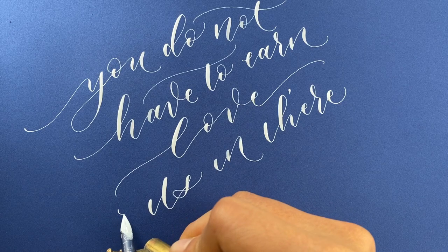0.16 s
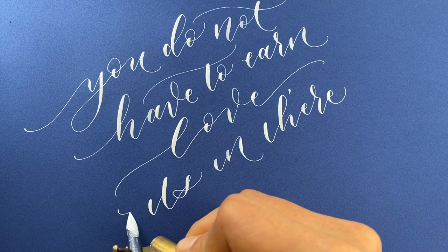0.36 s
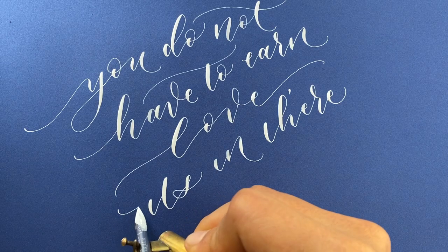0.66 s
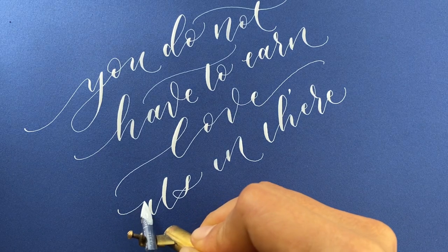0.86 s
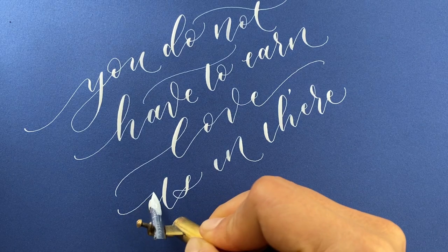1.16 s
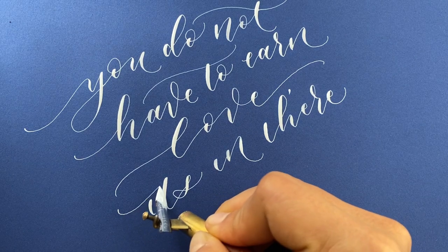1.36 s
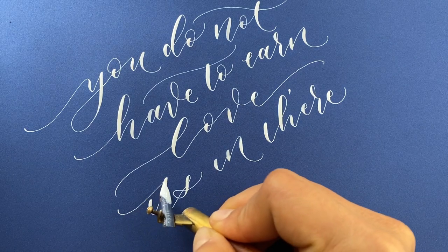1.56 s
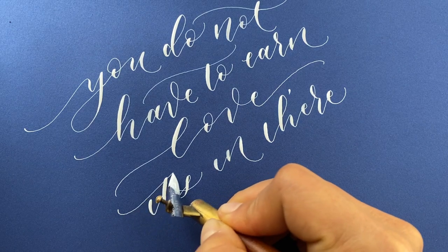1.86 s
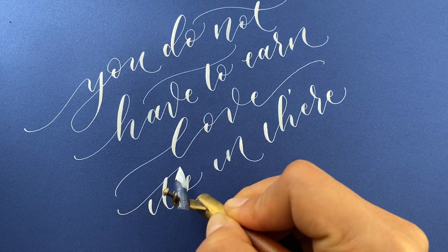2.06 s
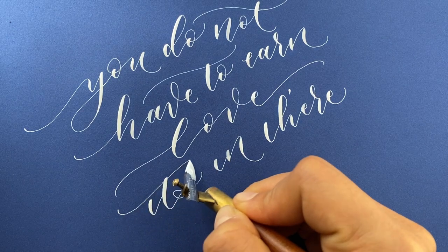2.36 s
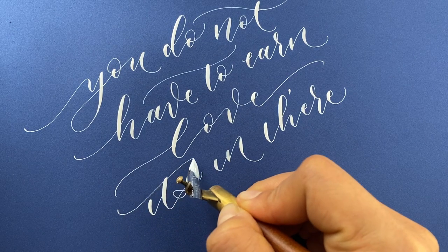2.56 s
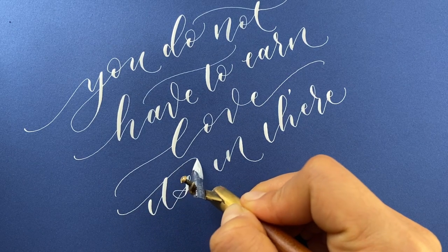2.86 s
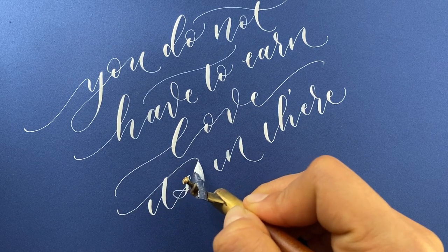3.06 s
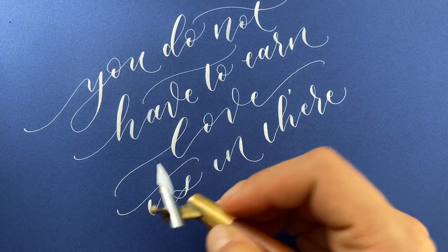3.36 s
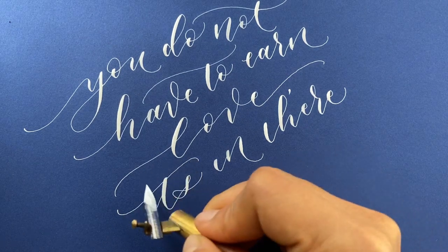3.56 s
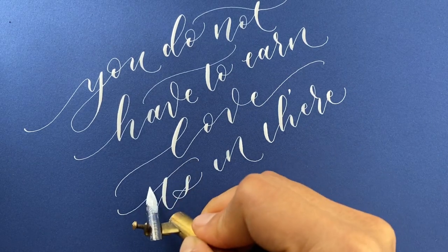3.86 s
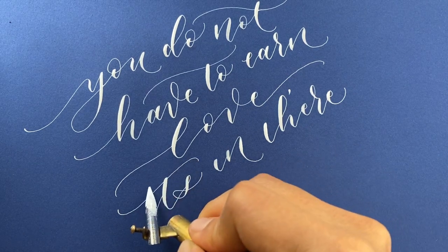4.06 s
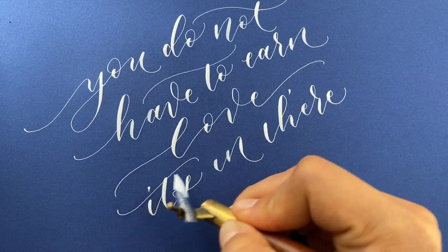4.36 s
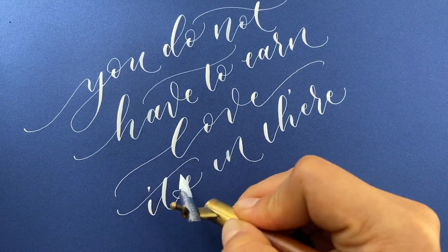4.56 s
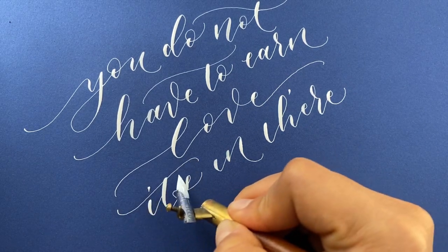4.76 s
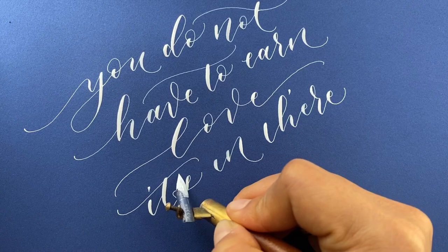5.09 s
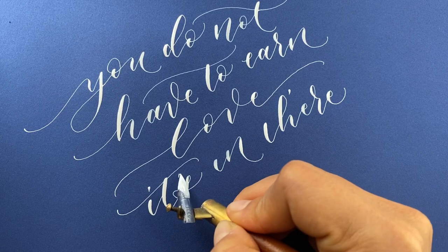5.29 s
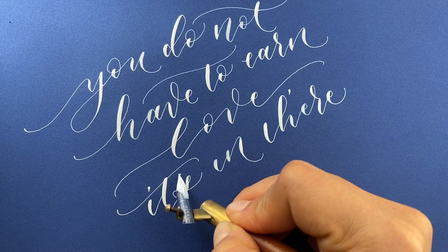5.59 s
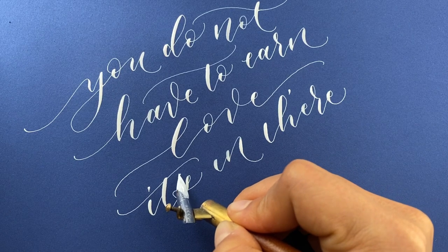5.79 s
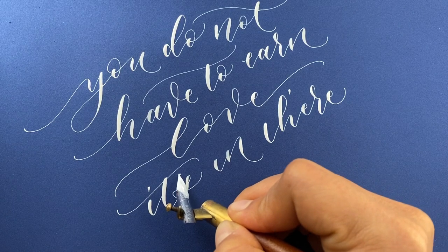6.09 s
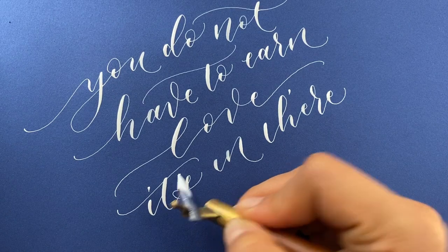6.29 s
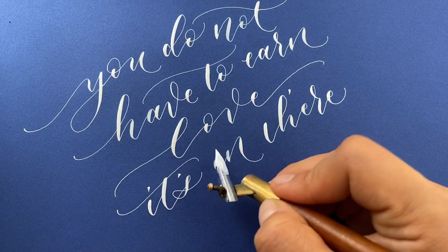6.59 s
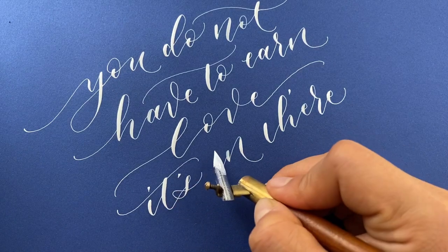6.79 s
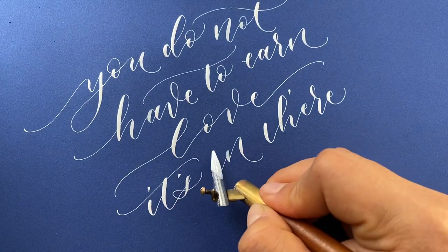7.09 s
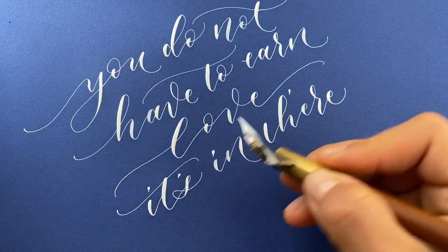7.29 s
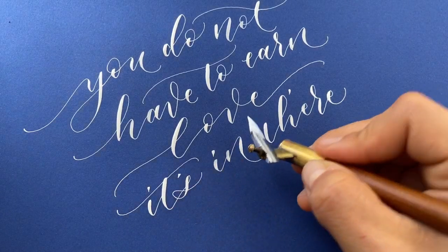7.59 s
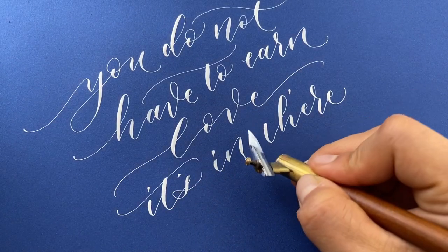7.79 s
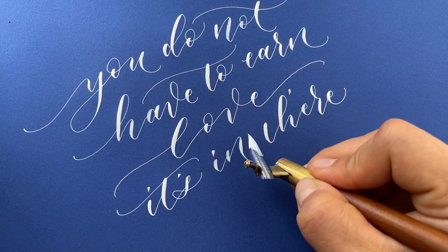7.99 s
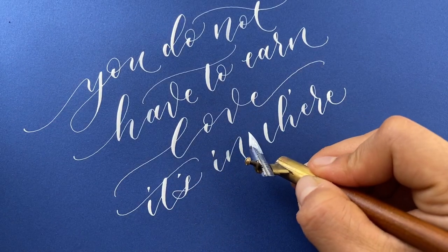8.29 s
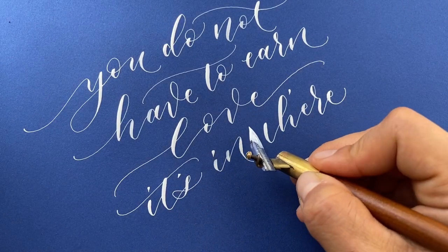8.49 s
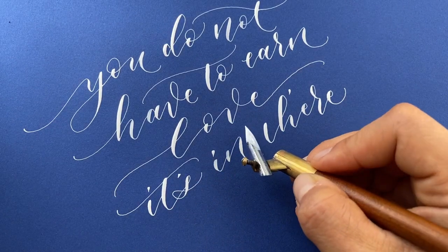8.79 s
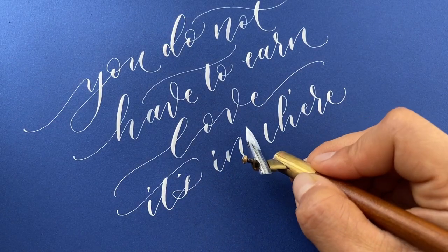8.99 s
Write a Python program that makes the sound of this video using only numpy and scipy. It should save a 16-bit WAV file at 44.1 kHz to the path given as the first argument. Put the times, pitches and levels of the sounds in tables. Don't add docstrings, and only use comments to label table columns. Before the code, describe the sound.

A deep, steady hum fills a quiet room while a dip pen scrapes paper close by: faint dry ticks, a rougher stuttering scratch, then smoother scrapes fading out. After a near-silent gap come small dull knocks on the desk, tiny holder creaks and brief papery hand rubs. The nib sits slightly left; faint road noise stays far behind.

```python
import sys
import numpy as np
from scipy import signal
from scipy.fft import rfft, irfft, next_fast_len
from scipy.io import wavfile
from scipy.ndimage import uniform_filter1d

SR = 44100
rng = np.random.default_rng(int(sys.argv[2]) if len(sys.argv) > 2 else 0)


def ratio_of_db(decibels):
    return 10 ** (np.asarray(decibels, float) / 20)


def dump_mix(stems):
    frames = np.atleast_2d(stems).T
    limited = np.clip(frames, -1, 1)
    pcm = np.round(limited * 32767).astype(np.int16)
    wavfile.write(sys.argv[1], SR, pcm)


N = 403284
T = np.arange(N) / SR
SIZE = next_fast_len(N + 4096)
HZ = np.arange(SIZE // 2 + 1) * SR / SIZE + 1e-3


def unit(x):
    return x / np.sqrt(np.mean(x ** 2))


def along(table):
    hz, value = np.transpose(table)
    return np.interp(np.log(HZ), np.log(hz), value)


def peak(hz, width):
    return 1j * width * HZ / (hz ** 2 - HZ ** 2 + 1j * width * HZ)


def heard(spectrum):
    return irfft(spectrum, SIZE)[..., :N]


def hiss(response, count):
    chance = rng.standard_normal((2, count, len(HZ)))
    return unit(heard((chance[0] + 1j * chance[1]) * response))


def walk(rate):
    k = int(SR / rate)
    held = np.repeat(rng.standard_normal(N // k + 1), k)
    slewed = uniform_filter1d(uniform_filter1d(held, k), k)
    return unit(slewed[:N])


def causal(gain):
    cepstrum = irfft(np.log(gain + 1e-9), SIZE)
    cepstrum[1:SIZE // 2] *= 2
    cepstrum[SIZE // 2 + 1:] = 0
    return np.exp(rfft(cepstrum))


def moves(rows, shape, dull_ends=0.):
    edge_db = 12
    dull, bright = np.zeros(N), np.zeros(N)
    for s, rise, fall, db, bright_db in rows:
        on = slice(max(int((s - 4 * rise) * SR), 0), int((s + 4 * fall) * SR))
        away = np.where(T[on] < s, (s - T[on]) / rise, (T[on] - s) / fall)
        gain = ratio_of_db(db - edge_db * away ** shape)
        dull[on] += gain
        bright[on] += gain * ratio_of_db(bright_db - dull_ends * away ** 2)
    return np.array([dull, bright])


def split(dull, bright, hz=8000):
    low = 1 / (1 + 1j * HZ / hz) ** 2
    return rfft(dull, SIZE) * low + rfft(bright, SIZE) * (1 - low)


def bursts(events, low, high, rise_s):
    out, age = np.zeros(N), np.arange(6000) / SR
    noises = rng.standard_normal((len(events), len(age)))
    for (s, db, hz, t60), noise in zip(events, noises):
        band = [low * hz, min(high * hz, 20000)]
        burst = signal.sosfilt(signal.butter(2, band, "band", fs=SR, output="sos"), noise)
        fade = (1 - np.exp(-age / rise_s)) * np.exp(-np.log(1000) * age / t60)
        level = np.sqrt(np.sum(fade ** 2) / np.sum((burst * fade) ** 2))
        out[int(s * SR):][:len(age)] += ratio_of_db(db) * burst * fade * level
    return out


# pitch_hz, lead_rad
PORT_LEAD = [(0, 0), (1500, .4), (3200, .9), (5000, .4), (7000, -.6), (7700, -1.7)]


def ports(spectrum, balance, blur_db):
    raw = HZ > 7900
    travel_s, most_rad = .000187, 2.5
    travel_lead = np.minimum(2 * np.pi * (2 - HZ * travel_s), most_rad)
    lead = np.where(raw, travel_lead, np.interp(HZ, *np.transpose(PORT_LEAD)))
    half = ratio_of_db(along(balance) / 2) * np.exp(.5j * lead)
    scatter = rfft(rng.standard_normal((2, 2500)) * np.exp(-np.arange(2500) / 200.0), SIZE)
    blur = 1 + ratio_of_db(blur_db - 2.3 * raw) * scatter
    return heard(spectrum * np.array([half, 1 / half]) * blur)


# pitch_hz, level_db (per Hz)
AIR = [(15, -52.5), (25, -23.5), (49, -6), (87, -13), (105, -13), (123, -9.5), (166, -15.5), (206, -20.5),
       (373, -34), (659, -54.5), (1020, -49.5), (1230, -61.5), (1520, -46), (2050, -60), (16000, -80.5)]
# pitch_hz, side_minus_mid_db
AIR_WIDE = [(60, -15.5), (250, -3.5), (600, -3), (1500, -3), (5000, -5.5), (15000, 5)]
# tyre_db, engine_db
ROAD_DB = (-90.5, -87.5)
# nearest_s, length_s, tyre_db, engine_db
VEHICLES = [(.45, 0.47, -80, -81), (1.15, 0.23, -79, -80.5), (2.25, 0.5, -86, -83), (3.5, 0.29, -88, -91.5),
            (4.15, .25, -86.5, -85), (5.35, 0.34, -92, -77.5), (6.1, .35, -80.5, -78),
            (7.45, .5, -84.5, -82.5), (8.35, 0.4, -80.5, -85.5), (8.75, 0.2, -83, -81.5)]


def air():
    colour = ratio_of_db(along(AIR))
    still = hiss(np.array([colour, colour * ratio_of_db(along(AIR_WIDE))]), count=2)
    still = still * ratio_of_db(-59 - 1.12 + 1.4 * walk(3.2))
    s, length, *peak_db = np.transpose(VEHICLES)
    slow = T[::441]
    near = np.exp(-((slow[:, None] - s) / length) ** 2)
    tyre, engine = (np.interp(T, slow, np.sqrt(ratio_of_db(2 * base) + near @ ratio_of_db(2 * db)))
                    for base, db in zip(ROAD_DB, peak_db))
    tyres = hiss(peak(1027, 300) ** 2 + ratio_of_db(-12.5) * peak(1400, 400) ** 2, count=2)
    engines = hiss(peak(580, 450) ** 2, count=2)
    tyres = tyres * tyre * ratio_of_db(1.6 * walk(14) - [[-1], [3]])
    engines = engines * engine * ratio_of_db(1.3 * walk(9) - [[1], [0]])
    mid, side = still + tyres + engines
    capsules = ratio_of_db(-93) * hiss(peak(3500, 5400) * peak(4000, 12000), count=2)
    return np.array([ratio_of_db(-0.16) * mid + side, ratio_of_db(-2.0) * mid - side]) + capsules


# start_s, turn_db, octave_db, third_multiple_db
HUM = [(0.0, -43.5, -57, -76.5), (0.48, -43.5, -52, -71.5), (1.09, -44.5, -62.5, -69.5),
       (1.4, -46.5, -67, -76), (2.3, -41.5, -70.5, -73), (2.65, -40.5, -68.5, -77.5),
       (3.28, -47.5, -62.5, -81), (3.79, -45.5, -60, -83), (4.4, -38.5, -57, -85.5),
       (5.11, -41, -56.5, -64.5), (5.78, -42, -59, -75.5), (6.19, -41, -60.5, -69), (6.5, -40.5, -55, -79),
       (7.0, -44, -64, -87.5), (7.66, -45.5, -63, -81), (8.2, -46, -59, -84), (8.65, -46, -51.5, -72),
       (9.14, -47.5, -58.5, -73.5)]
# start_s, pitch_hz
HUM_HZ = [(0, 78.55), (1.8, 78.4), (2.3, 78.25), (3.1, 78.6), (3.9, 78.25), (5.1, 77.95), (6.2, 77.95),
          (7, 77.6), (8, 77.25), (9.2, 77.5)]
# multiple, centre_s, length_s, level_db
WHINE = (8, 5.5, 0.64, -84)


def hum():
    s, *levels = np.transpose(HUM)
    levels.append(levels[-1] - 0.43)
    phase = 2 * np.pi * np.cumsum(np.interp(T, *np.transpose(HUM_HZ))) / SR
    tone = np.zeros(N)
    for k, (db, start_rad) in enumerate(zip(levels, [1.3, .9, 2.1, 4.2])):
        swell_db = np.interp(T, s, db) + (0.62 + .35 * k) * walk(6)
        tone += np.sqrt(2) * ratio_of_db(swell_db) * np.sin((k + 1) * phase + start_rad)
    multiple, at, length, db = WHINE
    tone += ratio_of_db(db) * np.exp(-((T - at) / length) ** 4) * np.sin(round(multiple) * phase)
    lag = 2
    return np.array([ratio_of_db(-1.8) * np.r_[tone[:lag], tone[:-lag]], ratio_of_db(0.98) * tone])


# top_s, rise_s, fall_s, level_db, brightness_db
SLIDES = [
    (4.375, 0.096, .078, -69, 5),
    (6.47, 0.099, 0.11, -66, 4),
    (7.44, .14, 0.17, -63.5, 4),
]
# top_s, rise_s, fall_s, level_db,
# brightness_db
LANDINGS = [(4.036, .002, 0.006, -80, 2), (4.132, 0.0078, 0.0044, -59, 0.5),
            (4.138, 0.0044, 0.0043, -56.5, -5.5), (4.145, 0.0033, 0.015, -59, 0),
            (4.103, .004, 0.04, -75, -2.5), (4.172, 0.017, .01, -75, 0), (4.27, .03, .03, -90, 10),
            (7.27, .04, .03, -93, 10), (6.296, 0.0078, 0.019, -83.5, 3), (7.028, 0.003, 0.004, -78, 3),
            (7.094, 0.005, 0.008, -75, 4), (7.18, 0.016, 0.01, -60, -1.5), (7.145, .012, .04, -68.5, -4.5),
            (7.21, .02, 0.034, -75, -2), (5.8, 0.0034, .008, -81, 1.5), (7.588, .002, .005, -64.5, -8)]
# pitch_hz, level_db
SKIN = [(300, -26), (800, -9), (1300, -6.5), (3000, 1), (4800, -2.5), (7000, -3), (8300, -1.5), (11500, -3),
        (13100, -2), (15600, -9.5), (16200, -31)]
# start_s, level_db, pitch_hz, t60_s
KNOCKS = [(4.035, -62.5, 800, 0.036), (4.035, -68, 1890, .02), (4.13, -50, 340, 0.14),
          (4.134, -57.5, 810, 0.14), (4.136, -59.5, 1730, 0.06), (4.996, -74, 890, 0.069),
          (5.385, -58.5, 300, 0.11), (5.39, -65.5, 908, 0.16), (7.098, -57, 270, 0.088),
          (7.167, -52.5, 432, 0.075), (7.167, -64.5, 800, 0.078), (7.167, -66, 1500, 0.15),
          (3.63, -79.5, 950, 0.18), (2.33, -71, 1750, 0.36), (4.038, -50.5, 231, 0.09),
          (4.7972, -64, 5200, .008), (7.157, -59, 650, 0.053), (7.213, -61.5, 400, 0.09),
          (7.14, -55.5, 230, 0.17)]
# start_s, level_db, pitch_hz, t60_s
CREAKS = [(2.668, -67.5, 11000, .023), (2.669, -62, 15200, .019), (3.035, -82, 4690, .1),
          (3.101, -72, 1300, .06), (3.1015, -76, 2100, .03), (2.7, -63, 1400, 0.052),
          (3.123, -70, 2000, 0.028), (3.283, -76, 10900, .04), (3.346, -82, 4600, .03),
          (3.385, -83, 10200, .08), (4.034, -68, 14800, .02), (4.0345, -71, 12000, .04),
          (4.035, -67, 3260, .04), (4.136, -58, 4400, .03), (4.143, -64, 11500, .03),
          (5.043, -72, 5200, .09), (5.06, -74, 4900, .08), (5.07, -70, 3100, .04),
          (5.108, -77.5, 4970, .043), (5.463, -76, 5100, .08), (5.476, -77, 5100, .08),
          (5.499, -76.5, 5100, .05), (5.507, -75, 5200, .07), (5.523, -75.5, 5100, .06),
          (6.03, -85.5, 5030, .12), (6.905, -73, 6300, .028), (6.9055, -75, 2700, .04),
          (7.02, -69, 15000, .03), (7.027, -71, 12200, .02), (7.0275, -72, 9500, .02),
          (7.08, -69, 15000, .02), (7.0805, -72, 12200, .02), (7.091, -62, 15000, .04),
          (7.0915, -66, 12200, 0.049), (7.092, -73, 3200, .038), (7.115, -70, 15000, .03),
          (7.117, -74, 3200, .04), (7.135, -72, 15000, .1), (7.172, -62, 15000, .04)]
# pitch_hz, left_minus_right_db
HAND_BALANCE = [(200, 0), (1300, 4.5), (2400, 2.5), (4800, 6), (7000, 1.5), (8200, -0.5), (15000, 0)]


def hand():
    rub = rng.standard_normal(N) * ratio_of_db(1.0 * walk(90) + 4.0)
    dull, bright = rub * (moves(SLIDES, 5.1, 7.4) + moves(LANDINGS, 1.1))
    slide = split(dull, bright) * ratio_of_db(along(SKIN))
    thuds = bursts(KNOCKS, low=0.51, high=0.98, rise_s=0.0003)
    creaks = bursts(CREAKS, low=.88, high=1.0, rise_s=0.0022)
    cloth = hiss(peak(11000, 3500) ** 2 + ratio_of_db(3) * peak(12050, 150), count=1)[0]
    rustle = cloth * ratio_of_db(-104 + 2.7 * walk(15))
    return ports(slide + rfft(thuds + creaks + rustle, SIZE), HAND_BALANCE, blur_db=-28.0)


# top_s, rise_s, fall_s, level_db, brightness_db
STROKES = [(.28, 0.077, 0.072, -92.5, 7), (.365, 0.026, 0.062, -82, 2.5), (.5, 0.055, 0.11, -83, 6.5),
           (.67, 0.045, 0.058, -82, 5.5), (.79, 0.039, .055, -67.5, -4), (.89, 0.089, 0.071, -80, -2),
           (1.05, 0.17, 0.063, -71, -6.5), (1.22, 0.12, 0.098, -69.5, -7), (1.37, 0.098, .11, -70, -7),
           (1.545, 0.027, 0.027, -74.5, -3), (1.66, 0.064, 0.039, -89.5, 2),
           (1.762, 0.026, .035, -59, -6.5), (1.855, 0.032, .048, -62, -8), (1.915, .008, .01, -69.5, -5),
           (1.98, .04, .06, -60.5, -8), (2.09, 0.07, 0.05, -61.5, -7), (2.152, 0.0053, 0.0094, -70.5, -4),
           (2.21, .033, 0.039, -60, -6), (2.32, 0.043, 0.031, -64.5, -5.5), (2.415, 0.024, 0.03, -71, -5),
           (2.54, .024, 0.029, -82, -1)]


def fibre_grains(brush):
    size_db = 4.5 * np.minimum(rng.exponential(size=N), 3.5)
    plucks_per_s = 6000
    grains = (rng.random(N) < plucks_per_s / SR) * rng.standard_normal(N) * ratio_of_db(size_db)
    grains = unit(grains) * ratio_of_db(2.7 * walk(90) + 1.9 * walk(300) + 3.0)
    return grains * (moves(STROKES, 3.2) + brush)


# start_s, level_db, brightness_db
SNAPS = [(0.1498, -75.5, -7), (0.2337, -72.5, -8), (0.2458, -73.5, -9), (0.2906, -71, -8),
         (0.3042, -69, -9), (0.3123, -74.5, -11.5), (0.3289, -67.5, -9), (0.3484, -67.5, -13),
         (0.3533, -64, -10), (0.3613, -62, -12), (0.3924, -58, -10), (0.409, -70, -8.5),
         (0.4254, -69, -11.5), (0.4464, -69.5, -11), (0.4684, -63.5, -9), (0.4966, -61, -7),
         (0.5113, -66, -10), (0.5356, -60, -13.5), (0.563, -64, -9), (0.5988, -69, -9),
         (0.6203, -69, -11.5), (0.6378, -63, -8.5), (0.6488, -65, -8), (0.6681, -64.5, -17),
         (0.6941, -66.5, -15), (0.7127, -67, -9), (0.749, -66.5, -12),
         (0.769, -54, -10), (0.7748, -58, -12), (0.7807, -54, -17.5), (0.7967, -43.5, -20),
           (0.8049, -53, -14), (0.8154, -45.5, -19), (0.8371, -59, -15), (0.8419, -59, -17),
           (0.8546, -65.5, -12), (0.8644, -56.5, -14), (0.8907, -60.5, -10.5), (0.9002, -59, -15),
           (0.9144, -61, -12), (0.9213, -58, -14.5), (0.9342, -40, -20), (0.9534, -59, -19),
           (0.9635, -52, -9.5), (0.9779, -59, -13), (0.9963, -57, -9), (1.0119, -58, -10),
           (1.0192, -37, -15), (1.0304, -50, -18), (1.0513, -34.5, -24), (1.0646, -32.5, -14),
           (1.0772, -42, -21), (1.1073, -58, -11), (1.1187, -43, -17), (1.137, -33, -23),
           (1.1666, -45, -14.5), (1.1757, -55, -9), (1.1947, -56, -9.5), (1.204, -50.5, -21),
           (1.2212, -55, -17), (1.2265, -55, -12), (1.2356, -52, -11.5), (1.2476, -48.5, -20.5),
           (1.2674, -60, -15), (1.285, -54.5, -15), (1.306, -59.5, -8.5), (1.3342, -39, -14),
           (1.3463, -42, -15.5), (1.3576, -47.5, -24), (1.3795, -52.5, -12), (1.3947, -58, -9),
           (1.4081, -37, -17.5), (1.4217, -47.5, -13), (1.4471, -55.5, -12.5),
         (1.5037, -74, -16), (1.5384, -65.5, -10), (1.5656, -71, -8), (1.7256, -68, -10.5),
        (1.7569, -54, -19), (1.7617, -51, -14), (1.7765, -53, -20), (1.8072, -68.5, -14.5),
        (1.825, -55.5, -12.5), (1.8304, -53, -15), (1.8436, -56, -22), (1.856, -51.5, -16),
        (1.8771, -57, -15), (1.8947, -56.5, -17), (1.9111, -60, -17), (1.9174, -61.5, -18),
        (1.9436, -57, -22), (1.949, -46.5, -17), (1.9566, -50, -20), (1.9685, -52, -15),
        (1.9859, -53.5, -16), (1.9968, -39, -21), (2.009, -55, -13), (2.0521, -56, -15), (2.0773, -52, -22),
        (2.086, -52.5, -15.5), (2.099, -54, -21.5), (2.103, -51.5, -18.5), (2.1224, -57, -19),
        (2.1365, -61, -16), (2.1484, -62, -16), (2.178, -54.5, -18.5), (2.1834, -53, -14), (2.28, -63, -15),
        (2.325, -57, -15), (2.3358, -56.5, -14), (2.3935, -64, -19.5), (2.4273, -62, -12),
        (2.4552, -73.5, -11), (2.5256, -69.5, -18.5), (2.5312, -70, -10), (2.5382, -69.5, -8.5),
        (2.5624, -76, -16), (2.6259, -74, -9)]
# start_s, level_db, brightness_db
TICKS = [(3.4526, -78, -9.5), (3.8122, -72, -11), (4.0356, -75, 6), (4.9938, -64.5, -3), (5.005, -63, -9),
         (5.0126, -69, -14.5), (4.9765, -72.5, -13), (5.3708, -64.5, -10), (5.3756, -64, -9),
         (7.586, -66, -8), (7.1152, -86, 7), (5.3502, -67, -6), (6.2923, -80.5, -14), (7.0273, -79.5, 6),
         (7.0922, -73.5, 2.5), (7.081, -82, 6)]


def snap_releases():
    snaps = SNAPS + TICKS
    age, release = np.arange(300), 26
    spread = np.exp(-abs(age - release) / np.where(age < release, 30., 34.))
    tears = 0.18 * rng.standard_normal((len(snaps), len(age))) * spread
    drive = np.zeros((2, N))
    for (s, db, bright_db), tear in zip(snaps, tears):
        gain = ratio_of_db(db + np.array([[13], [bright_db + 21.5]]))
        drive[:, int(s * SR):int(s * SR) + len(age)] += gain * (tear + (age == release))
    return drive


# top_s, rise_s, fall_s, level_db, brightness_db
TOUCHES = [(2.622, 0.0083, .1, -87, -1), (2.75, .005, .025, -84.5, -5), (2.97, .11, 0.022, -90, 0),
           (3.056, .03, .014, -85.5, -2.5), (3.3, .03, 0.096, -91, 0), (3.45, .08, 0.042, -88, -1),
           (3.576, 0.013, 0.018, -88, 0), (3.81, .01, 0.027, -84, -7.5), (5.002, .016, 0.011, -64, -5.5),
           (5.045, 0.006, .035, -76, -4.5), (5.08, .03, .006, -76, -4.5), (5.283, .025, 0.02, -86.5, 7),
           (5.4, 0.027, .016, -59.5, -3.5), (5.47, .02, .05, -80.5, -4.5), (5.53, .05, .012, -81, -4.5),
           (5.648, .008, .04, -85, -8), (5.718, 0.014, 0.041, -87.5, -2), (6.052, .055, .012, -86, -1.5)]
# pitch_hz, width_hz, level_db
NIB = [(1660, 600, -11), (2700, 250, -10.5), (3490, 300, -5), (4323, 240, -0.5), (5200, 250, 0),
       (5960, 110, -5.5), (6820, 250, -1.5), (7920, 400, -2.5), (8570, 400, -1), (9600, 400, -5.5),
       (11020, 320, -4.5), (12550, 350, -1), (13600, 600, -6.5), (14500, 900, -18)]
# pitch_hz, width_hz, share_removed
NIB_NOTCHES = [(2300, 400, .85), (11700, 800, .8), (4650, 92, 0.49)]
# delay_s, level_db
DESK_ECHOES = [(.0013, -25.5), (.0045, -15.5), (.009, -18.5)]
# pitch_hz, left_minus_right_db
NIB_BALANCE = [(400, 7.5), (1300, 10), (2400, 8.5), (4400, 8), (7000, -1), (8200, 3), (15000, -1.5)]


def nib():
    brush = moves(TOUCHES, 1.3)
    dull, bright = fibre_grains(brush)
    rings = sum(abs(ratio_of_db(db) * peak(hz, width)) ** 2 for hz, width, db in NIB)
    rub_body = abs(ratio_of_db(-11) * peak(3300, 1500)) ** 2
    sheet_crack = (abs(ratio_of_db(-7) * peak(6400, 3300)) ** 2 + abs(ratio_of_db(-22) * peak(1300, 1800)) ** 2
                   + abs(ratio_of_db(-22) * peak(650, 600)) ** 2)
    steel = split(dull, bright, hz=5200) * causal(np.sqrt(rings + rub_body))
    steel += split(*snap_releases()) * causal(np.sqrt(rings + sheet_crack))
    gaps = np.prod([1 - share * peak(hz, width) for hz, width, share in NIB_NOTCHES], axis=0)
    desk = 1 + sum(ratio_of_db(db) * np.exp(-2j * np.pi * HZ * s) for s, db in DESK_ECHOES)
    fibres = 1.4 * uniform_filter1d(abs(dull), 90) * rng.standard_normal(N)
    top = peak(14800, 1900) ** 2
    fizz = rfft(fibres, SIZE) * (ratio_of_db(-9.5) * peak(13000, 1800) ** 2 + ratio_of_db(-20) * peak(8800, 2500)
                                 + ratio_of_db(-4.5) * top)
    fizz += rfft(brush[1] * rng.standard_normal(N), SIZE) * ratio_of_db(4.0) * top
    return ports(steel * gaps * desk * ratio_of_db(7) + fizz, NIB_BALANCE, blur_db=-30.5)


def scene():
    return air() + hum() + hand() + nib()


def low_pass(x):
    return signal.sosfilt(signal.butter(12, 16710, fs=SR, output="sos"), x)


# pitch_hz, width_hz, level_db
MIC_LIFT = (14900, 1400, 3.9)


def record(dry):
    lift_hz, lift_width, lift_db = MIC_LIFT
    mic = 1 + (ratio_of_db(lift_db) - 1) * peak(lift_hz, lift_width)
    mic = mic * (1 - .32 * np.exp(-((HZ - 13420) / 310) ** 4))
    mic = mic * (ratio_of_db(-24) + 1 / (1 + (HZ / 15780) ** 200))
    return low_pass(heard(rfft(dry, SIZE) * mic))


dry = scene()
out = record(dry)
dump_mix(out)
```